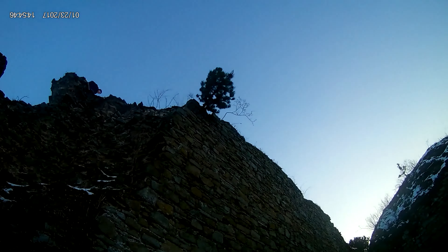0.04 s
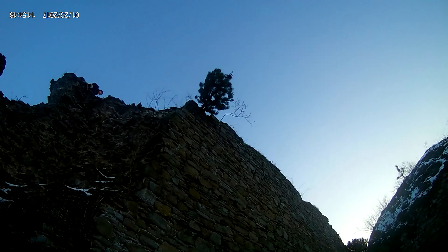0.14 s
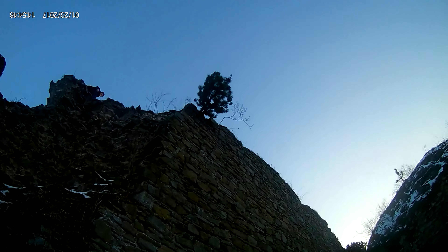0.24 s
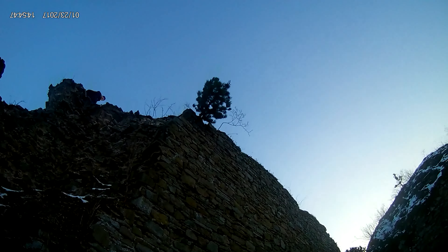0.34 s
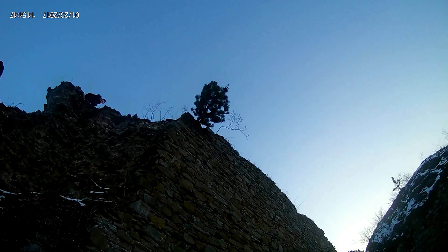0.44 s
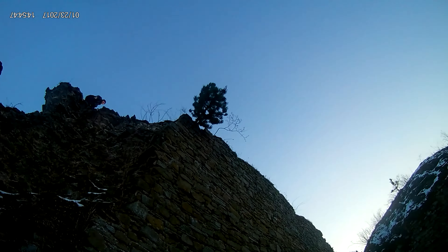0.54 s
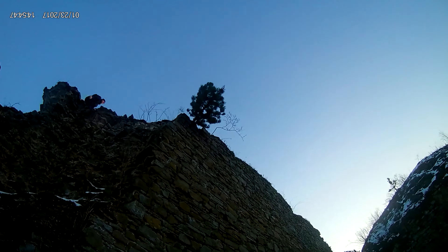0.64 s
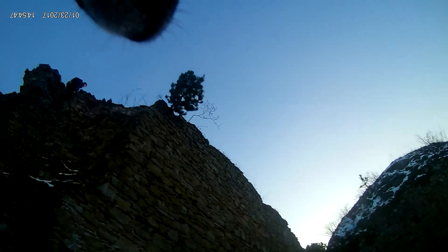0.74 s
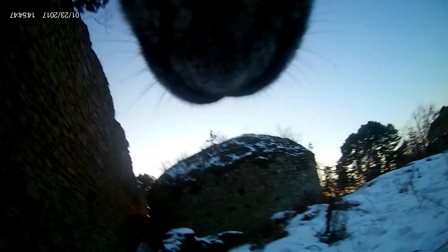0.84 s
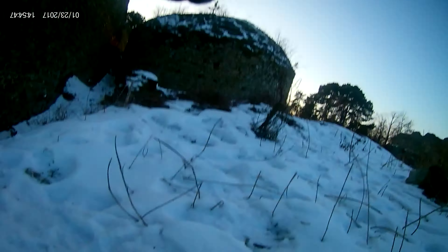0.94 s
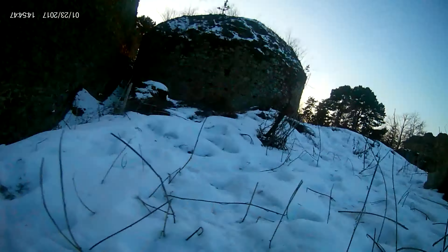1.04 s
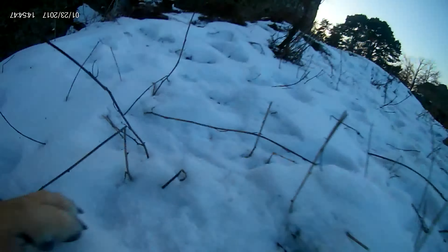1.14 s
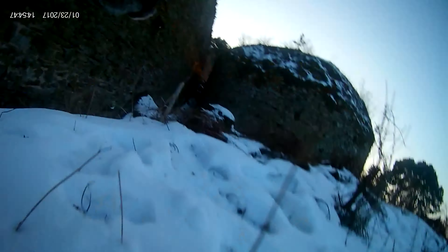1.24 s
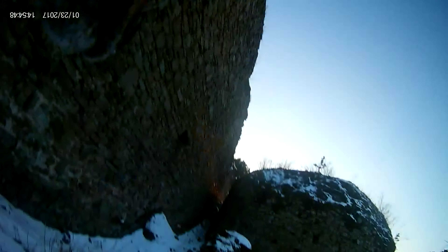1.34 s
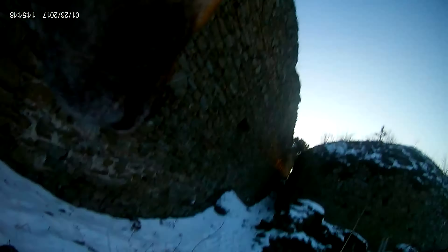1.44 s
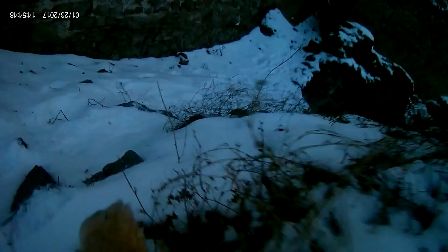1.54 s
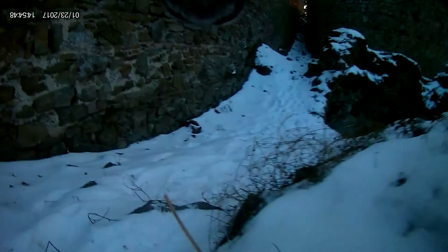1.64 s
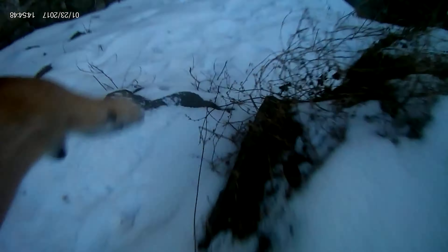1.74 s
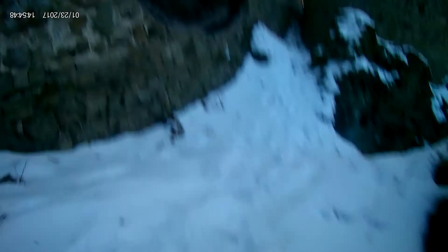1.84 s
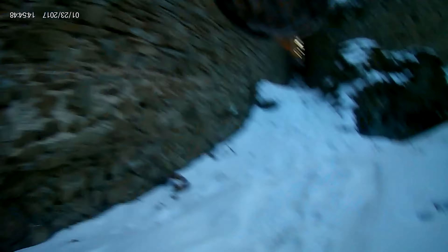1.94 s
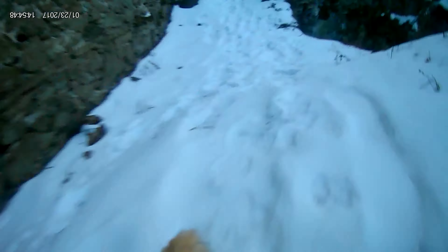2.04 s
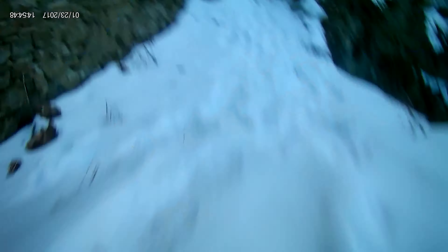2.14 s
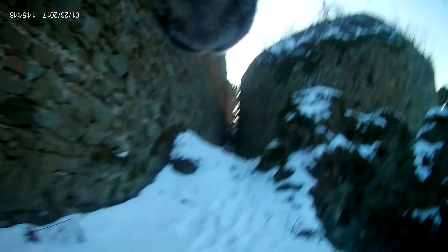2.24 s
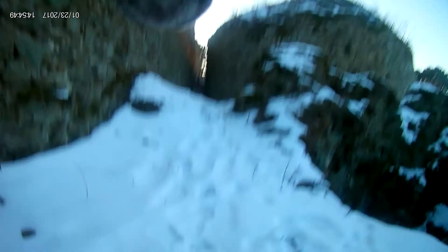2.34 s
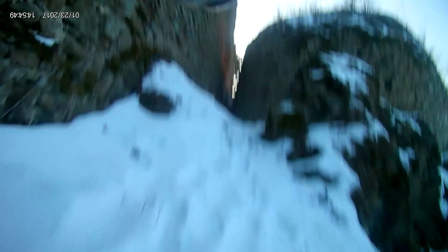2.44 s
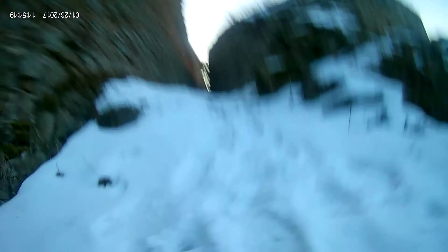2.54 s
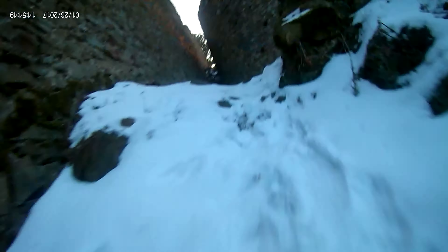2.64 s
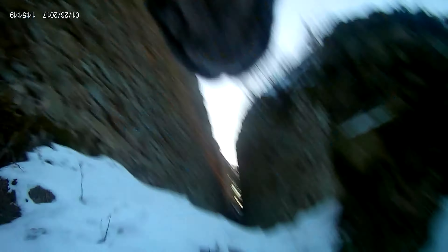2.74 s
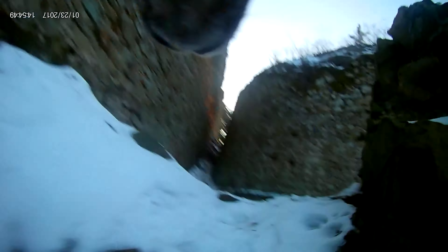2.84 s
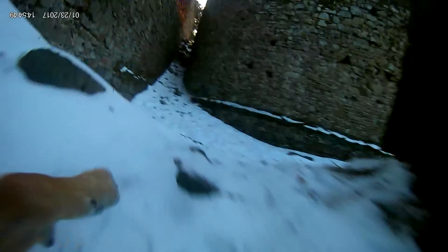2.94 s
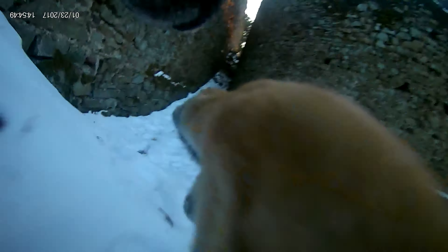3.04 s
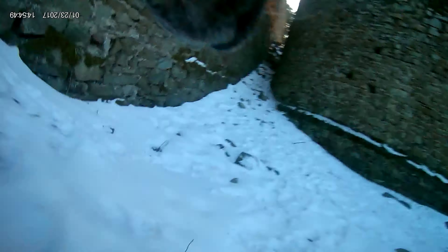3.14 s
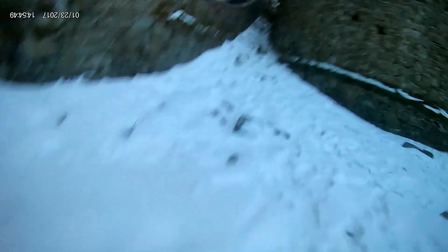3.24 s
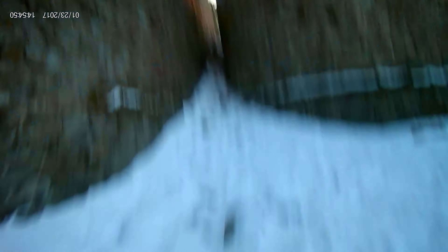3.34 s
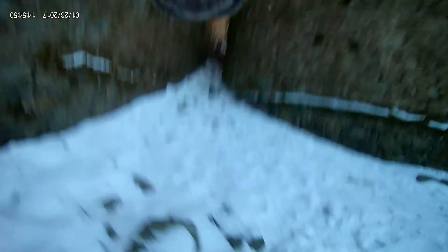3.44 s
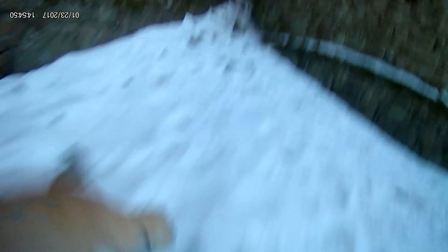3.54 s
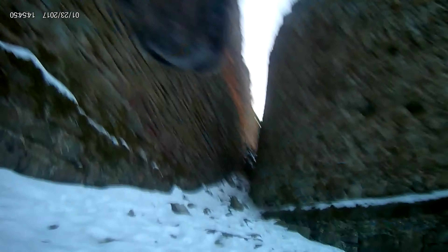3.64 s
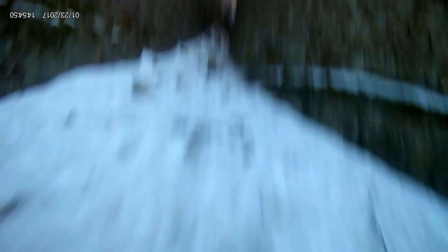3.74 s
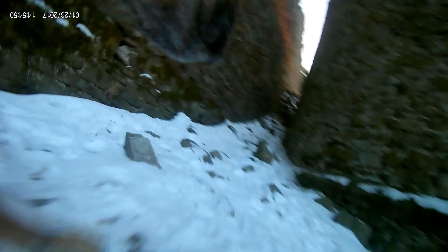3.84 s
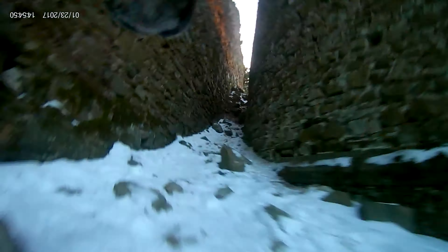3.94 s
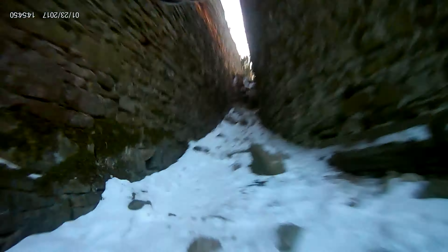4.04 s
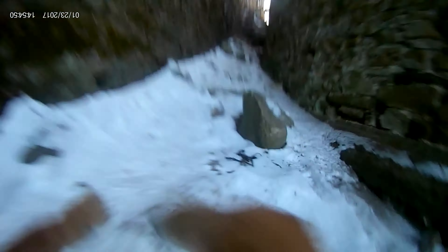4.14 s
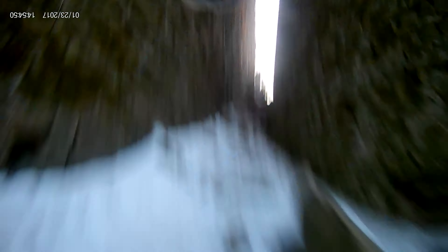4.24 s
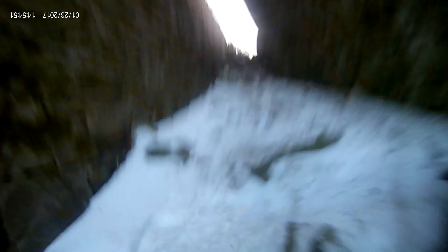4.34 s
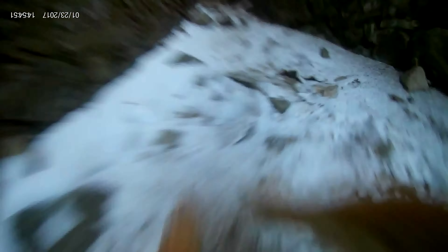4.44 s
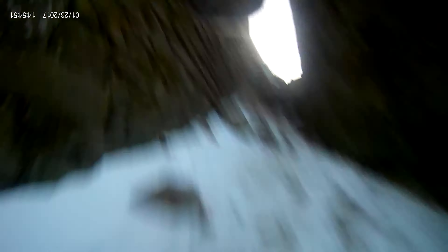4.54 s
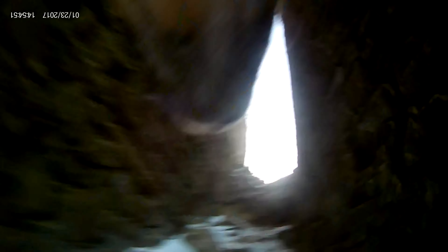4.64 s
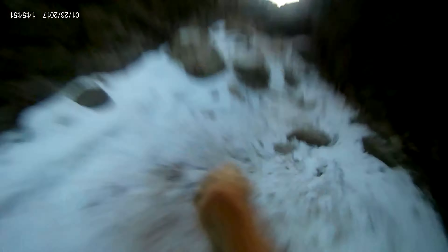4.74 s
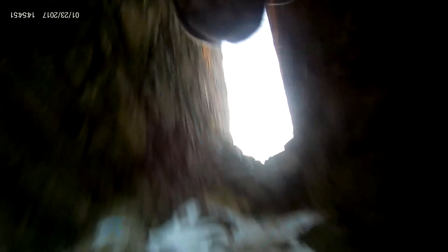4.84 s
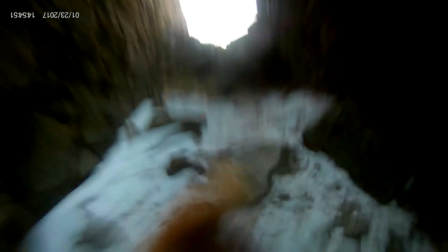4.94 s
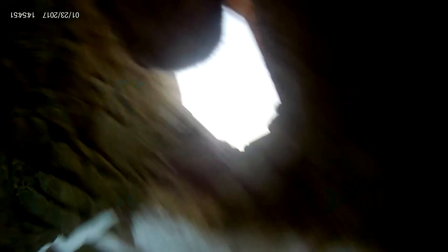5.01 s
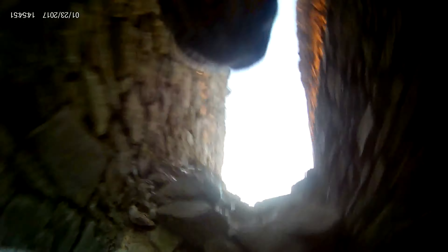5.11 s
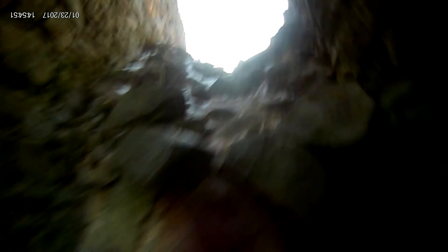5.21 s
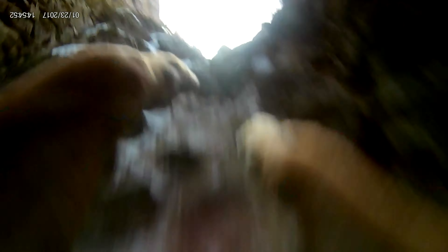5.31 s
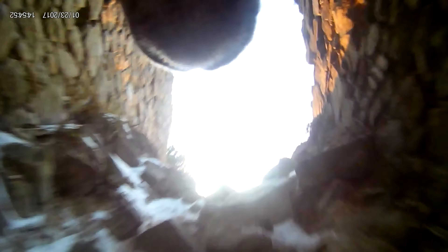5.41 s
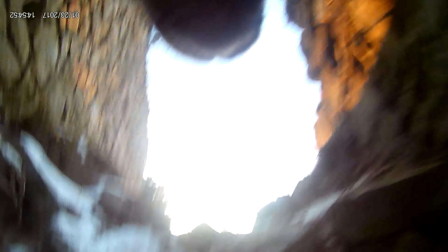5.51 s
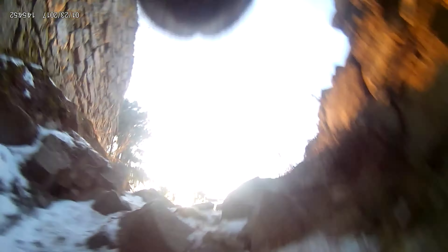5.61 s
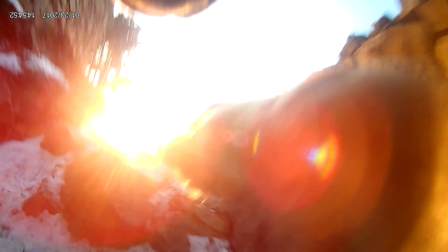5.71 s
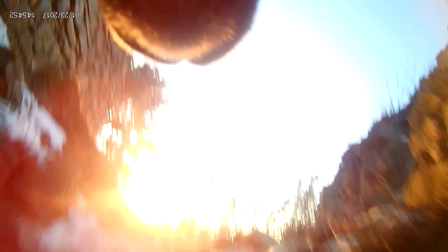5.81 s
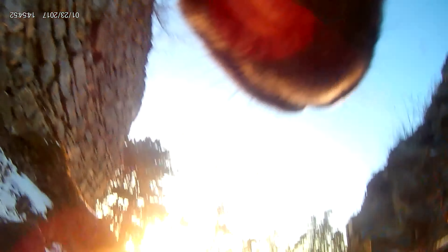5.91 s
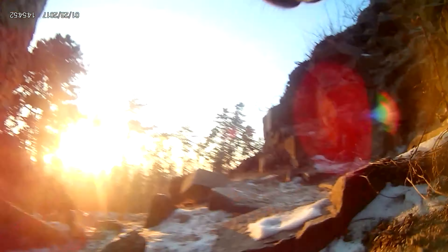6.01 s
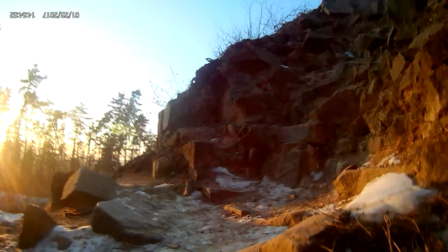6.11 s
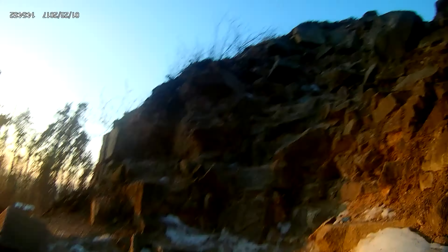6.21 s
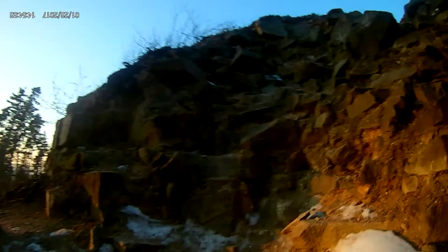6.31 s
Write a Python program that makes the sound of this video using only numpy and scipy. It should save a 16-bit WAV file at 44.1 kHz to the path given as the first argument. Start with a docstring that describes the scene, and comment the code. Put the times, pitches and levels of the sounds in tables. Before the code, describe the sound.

Close, dry plastic knocks, rattles and scratchy fur rubbing from a small camera housing on a running dog's collar, with low thumps and rumble.

```python
"""Blows on a small sealed plastic camera housing, hung from the collar of an animal running over snow and rock.
Each blow's push and chatter of contacts excite the housing's resonances, and rubbing fur and strap
excite the same modes through dense stick-slip ticks.
Jolts squeeze the air trapped at the microphone, random tugs of the swinging collar make a low rumble,
and steady self-noise lies underneath; the input saturates on the hardest blows, flattening their tops."""
import sys
import numpy as np
from scipy import signal
from scipy.fft import rfft, irfft
from scipy.io import wavfile
from scipy.ndimage import uniform_filter1d, map_coordinates

SR = 44100
rng = np.random.default_rng(int(sys.argv[2]) if len(sys.argv) > 2 else 0)


def output_pcm(signal):
    """Save a mono or channel-first signal as 16-bit PCM at the path in sys.argv[1].

    Samples are clipped to [-1, 1] before scaling.
    """
    pcm = np.clip(np.atleast_2d(signal).T, -1, 1) * 32767
    wavfile.write(sys.argv[1], SR, np.round(pcm).astype(np.int16))


N = 280917

# squeezes of the trapped air, levels before the leak: # push_peak_s, pull_level_db (before the push),
# push_level_db, length_scale_ms
SQUEEZES = [(0.9637, -60, -16.5, 2.4), (0.9753, -62, -13, 2.5), (1.1055, -36, -17.5, 1.36),
            (1.2975, -58, -21.5, 2.9), (1.5414, -48, -26, 2.1), (1.7587, -67, -24.5, 1.6),
            (1.7832, -4.5, -13, 11.5), (1.862, -30.5, -55, 20), (1.98, -22, -18, 2),
            (1.992, -51, -6.5, 5.1), (1.9974, -55, -12.5, 2.1), (2.015, -50, -21, 16),
            (2.076, -25, -56, 15), (2.3694, -61, -15.5, 2.3), (2.4935, -39, -22.5, 2.2),
            (2.5702, -55, -8.5, 3.1), (2.594, -56, -21, 20), (2.686, -22, -54, 8),
            (2.7754, -51, -20.5, 3.3), (2.904, -57, -17, 8.2), (3.0097, -3.5, -5.5, 7.3),
            (3.345, -27.5, -56, 8), (3.5188, -22, -56, 6.1), (3.659, -27.5, -25.5, 4.9),
            (3.694, -54, -25, 3.2), (3.7023, -55, -24.5, 3), (3.712, -46, -0.5, 2.13),
            (3.815, -20, -53, 22), (3.9328, -40, -25.5, 4.3), (4.3494, -52, -13.5, 3.9),
            (4.381, -55, -20, 30), (4.549, -54, -24, 2.8), (4.9655, 7.5, 4, 7.2), (5.002, -18.5, -40, 15.5),
            (5.15, -55, -25, 3.3), (5.1607, -53.5, -6.5, 2.9), (5.1638, -56, -11.5, 1.8),
            (5.226, -55, -21, 25), (5.313, -55, -25.5, 17), (5.548, -56, -25, 6.5), (5.6468, -36, -3, 3.5),
            (5.6533, -2.5, -11, 4.6), (5.6608, -24, -7, 7), (5.709, -12, -14, 10), (5.9436, -61, -25, 3.4),
            (6.2874, -53, -22, 1.9)]
# lower resonances of the housing: frequency_hz, width_hz, relative_gain_db
LOW_MODES = [(343, 490, -9), (573, 125, 0), (1082, 477, -6.5), (1479, 248, 1.5), (1488, 184, 2),
             (1644, 172, 3), (2055, 100, -3), (2372, 288, -7.5)]
# upper resonances of the housing: frequency_hz, width_hz, relative_gain_db
HIGH_MODES = [(2490, 470, 0.5), (3300, 170, 4), (3800, 333, 1.5), (4987, 200, -0.5), (5670, 350, -8),
              (7200, 500, 2)]
# resonance of the air in front of the microphone: frequency_hz, width_hz, relative_gain_db
AIR_MODE = [(1665, 1240, 6.5)]
SEAL_HZ = 5950  # the sealed shell passes little above this
DRIFT = 0.03  # scale of the modes' detuning, as a share of frequency


def undb(db):
    """Level law: amplitude ratio = 10 ** (dB / 20)."""
    return 10 ** (np.asarray(db) / 20)


def level(x, db):
    """Root-mean-square normalization to a level in dB re 1."""
    return x * undb(db) / np.sqrt(np.mean(x ** 2))


def curve(table):
    """Linear interpolation in time of each column after the first."""
    s, *columns = np.transpose(table)
    return [np.interp(np.arange(N) / SR, s, column) for column in columns]


def walk(rate_hz):
    """Slewed sample-and-hold noise: random values held for one period, with a spread near 1."""
    hold = int(SR / rate_hz)
    steps = np.repeat(rng.standard_normal(N // hold + 1), hold)
    return 1.68 * uniform_filter1d(steps, hold // 2 + 1)[:N]


def add(out, s, x):
    """Linear superposition of an event that starts at s seconds."""
    i = int(s * SR)
    out[i:i + len(x)] += x[:len(out) - i]


def ring(force, modes, shares):
    """Modal superposition: each resonance takes its share of the force, then the shell low-passes the sum."""
    total = 0
    for share, (hz, width_hz, db) in zip(shares, modes):
        b, a = signal.iirpeak(hz, hz / width_hz, SR)
        total = total + share * undb(db) * signal.lfilter(b, a, force)
    shell = signal.ellip(5, 1, 30, SEAL_HZ, fs=SR, output="sos")
    return signal.sosfilt(shell, total)


def still():
    """Stationary self-noise of the microphone: white noise shaped to a fixed spectrum of hiss and faint rumble."""
    # shape of the self-noise: frequency_hz, relative_level_db
    noise_shape = [(12, -37.5), (20, 10.5), (60, -5), (377, -17), (434, -19.5), (1570, -24), (6010, -35.5),
                   (14700, -36.5), (16000, -34)]
    hz, db = np.transpose(noise_shape)
    bins_hz = np.fft.rfftfreq(N, 1 / SR)
    gain = undb(np.interp(np.log(bins_hz + 1), np.log(hz), db))
    return level(irfft(rfft(rng.standard_normal(N)) * gain, N), -66)


def swing():
    """Filtered shot noise: random tugs of the collar, stronger just after a jolt, make a lumpy low rumble."""
    # strength of the swing: time_s, relative_level_db
    swing_strength = [(0.7, -61), (0.82, -44), (1.48, -47.5), (1.72, -36), (2.11, -41.5), (2.4, -42.5),
                      (2.58, -34.5), (3.09, -61), (3.36, -30.5), (3.49, -41.5), (3.7, -32.5), (4.25, -40.5),
                      (4.81, -37), (5.1, -42), (5.53, -41), (5.82, -47.5), (6.21, -54.5), (6.37, -50)]
    # each jolt shakes the collar: level against the jolt's stronger half, lag, spread
    shake_db, delay_s, spread_s = -35, 0.034, 0.044
    t = np.arange(N) / SR
    db, = curve(swing_strength)
    size = undb(db)
    for s, pull_db, push_db, _ in SQUEEZES:
        shake = np.exp(-((t - s - delay_s) / spread_s) ** 2)
        size = size + undb(max(pull_db, push_db) + shake_db) * shake
    tugs = (rng.random(N) < 90 / SR) * rng.standard_normal(N)  # 90 per second on average
    tugs = tugs * size * undb(2.6 * walk(14)) * (t > swing_strength[0][0])
    low = signal.sosfilt(signal.butter(2, 30, fs=SR, output="sos"), tugs)
    bumps = signal.sosfilt(signal.butter(2, [70, 300], "bandpass", fs=SR, output="sos"), tugs)
    return undb(55) * low + undb(24) * bumps


def pressure():
    """Power addition of a steady rub and scuffs: drive for the lower modes, the upper modes and the treble spray."""
    # steady rubbing of fur and strap: time_s, relative_level_db
    steady_rub = [(0.67, -74), (0.74, -66), (0.9, -57), (1.15, -50), (1.465, -54.5), (1.6, -52.5),
                  (1.85, -45), (2.12, -52), (2.25, -46.5), (2.65, -46.5), (2.97, -49.5), (3.2, -62.5),
                  (3.45, -47), (3.8, -52.5), (4.2, -54), (4.69, -53.5), (5.05, -42.5), (5.44, -57),
                  (5.75, -48), (6.03, -61.5)]
    # scuffs, when a stride drags the housing across the fur:
    # start_s, hold_ms, relative_level_db, brightness_db
    scuffs = [(0.75, 69, -51.5, -11), (0.958, 22, -38, -9), (1.057, 40, -50.5, -11),
              (1.109, 23, -42.5, -10), (1.195, 34, -43, -8), (1.351, 44, -47, -9), (1.529, 15.4, -44, -6.5),
              (1.621, 18, -44, -10), (1.777, 16, -44, 0), (1.89, 55, -38, -12), (1.974, 22, -27.5, -20),
              (2.041, 17, -40, -14.5), (2.148, 39, -36.5, -10.5), (2.376, 22, -43, -1),
              (2.472, 27, -37, -8), (2.545, 55, -40, -11), (2.73, 49, -36.5, -11), (2.832, 59, -39.5, -16),
              (2.911, 21, -42, -17), (3.005, 17, -48.5, 3), (3.253, 86, -40.5, -13.5),
              (3.51, 14, -44.5, -1.5), (3.634, 32, -33, -13), (3.711, 12, -32, -9.5),
              (3.74, 77, -40.5, -14), (3.897, 42, -38, -21), (3.997, 55, -37.5, -10.5),
              (4.239, 62, -35.5, -12.5), (4.352, 20, -26.5, -27), (4.409, 25, -39, -22),
              (4.438, 12, -34, -6), (4.478, 20, -32, -12), (4.514, 115, -39.5, -15), (4.731, 43, -48, -3),
              (4.8, 36, -36, -14), (4.93, 28, -36, -15), (4.972, 26, -34, -1), (5.142, 23, -31.5, -16),
              (5.21, 20, -39.5, -11.5), (5.24, 130, -51, -2), (5.485, 12, -38.5, -9.5),
              (5.519, 45, -42.5, -19), (5.652, 9, -31, -3), (5.712, 30, -37, -13), (5.945, 45, -47, -12),
              (6.15, 48, -53.5, -14), (6.228, 30, -42, -17), (6.288, 66, -54, -7)]
    attack_db_s, release_db_s = 1502, 801  # slopes in the lower modes; the other two rows are steeper
    rub_bright_db = -9.5  # brightness of the steady rub
    step = 16  # samples per value
    t = np.arange(0, N, step) / SR
    db = curve(steady_rub)[0][::step]
    reach = np.array([[0], [1], [1.9]])  # how far brightness counts in each of the three rows
    power = undb(db + reach * rub_bright_db) ** 2
    for s, hold_ms, db, bright_db in scuffs:
        before_s = np.maximum(s - t, 0)
        after_s = np.maximum(t - s - hold_ms / 1000, 0)
        fall_db = attack_db_s * before_s + release_db_s * after_s
        power = power + undb(db + reach * bright_db - (1 + 0.3 * reach) * fall_db) ** 2
    drive = np.sqrt(power) * (t > steady_rub[0][0])
    return np.repeat(drive, step, axis=1)[:, :N]


def rubbing():
    """Stick-slip friction: dense uneven ticks excite modes that trade strength as the rubbed spot wanders."""
    heavy_tail = undb(2.41 * np.minimum(rng.exponential(size=(2, N)), 3.2))
    slips = (rng.random((2, N)) < 3000 / SR) * rng.standard_normal((2, N)) * heavy_tail
    slips += (rng.random(N) < 90 / SR) * rng.uniform(-1, 1, N) * undb(12)  # now and then a hair snaps free
    patches = undb(0.5 * walk(45) + 1.5 * walk(160))
    low_slips, high_slips, spray_slips = slips[[0, 1, 1]] * pressure() * patches

    shares = [(-1) ** k * undb(1.49 * walk(22)) for k in range(len(LOW_MODES))]
    shell = ring(low_slips, LOW_MODES, shares)
    body = undb(21.5) * shell + undb(8.5) * ring(shell, AIR_MODE, [1])
    # the grip of fur and strap detunes the housing: a wandering lag bends the lower modes
    lag = DRIFT * signal.lfilter([1], [1, 30 / SR - 1], walk(25))
    body = map_coordinates(body, [np.arange(N) + lag], mode="mirror")

    high_shares = [share * undb(0.8 * walk(40)) for share in shares]
    edge = ring(high_slips * undb(1.2 * walk(60)), HIGH_MODES, high_shares)
    # treble that gets past the seal, mostly from bright scuffs
    spray_band = signal.butter(2, [8300, 11000], "bandpass", fs=SR, output="sos")
    spray = signal.sosfilt(spray_band, spray_slips)
    return body + undb(10.3) * edge + undb(-15) * spray


def jolts(rise=0.26, overlap=0.13, brief=0.6):
    """Compression of trapped air: a brief pull lets go fast, then a push rises fast and falls slower."""
    out = np.zeros(N)
    for s, pull_db, push_db, ms in SQUEEZES:
        rise_s = rise * ms / 1000
        for db, way, span_s in ((push_db, 1, rise_s), (pull_db, -1, brief * rise_s)):
            u = np.arange(int(8 * span_s * SR)) / (span_s * SR)
            hump = (u * np.exp(1 - u)) ** 2  # peaks at u = 1
            start_s = s - rise_s
            if way < 0:
                start_s = s - rise_s * (1 - overlap) - len(u) / SR
            add(out, start_s, way * undb(db) * hump[::way])  # the pull runs reversed
    return out


def leak(x):
    """Second-order high-pass: trapped air leaks past the seal, so every squeeze swings back once, slowly."""
    corner_hz, width_hz = 24.7, 26
    w = 2 * np.pi * corner_hz
    b, a = signal.bilinear([1, 0, 0], [1, 2 * np.pi * width_hz, w * w], SR)
    return signal.lfilter(b, a, x)


def knocks(chatter=0.19, fade=0.91, spot_db=5.5, direct_db=3, follow=0.2):
    """Impact excitation: a short push and a chatter of contacts, shared among modes by where the blow lands."""
    # blows on the housing: start_s, body_peak_db, contact_scale_ms, upper_mode_brightness_db
    blows = [(0.359, -54, 2.9, -10), (0.745, -44, 2.2, -8), (0.926, -21.5, 7.6, -32),
             (0.963, -10, 3.7, -11), (0.9741, -20, 1.7, -22), (1.1057, -13, 4.1, -11),
             (1.172, -33.5, 1.8, -35), (1.2944, -20, 3.1, -20.5), (1.384, -28.5, 2.7, -22),
             (1.497, -39.5, 1.4, -2), (1.644, -31.5, 2, -4.5), (1.6826, -23, 2.4, -36),
             (1.7572, -20.5, 3.1, -12), (1.765, -32, 2.5, 0), (1.8986, -26, 3.9, -42),
             (1.9746, -8.5, 0.97, -25), (1.9916, -4.5, 12.3, -20), (1.9975, -14, 3, -8),
             (2.066, -30, 1.5, -33), (2.146, -24, 6.9, -34), (2.1656, -23, 3.2, -23),
             (2.317, -26.5, 4.2, -31), (2.3693, -14.5, 3.4, -27), (2.4549, -24, 5.8, -41),
             (2.5455, -25, 3, -15), (2.5689, -13, 3.6, -17), (2.587, -23, 4.1, -30), (2.6155, -36, 2, 0),
             (2.667, -20.5, 1.9, -17), (2.7716, -24.5, 1.8, -41), (2.8581, -12.5, 0.94, -27),
             (2.9024, -11.5, 4.2, -8), (2.9992, -34, 3.1, 12), (3.0084, -16.5, 3.7, -12),
             (3.013, -16, 4.7, -36), (3.072, -42.5, 5.9, 3.5), (3.2655, -27, 5.9, -35),
             (3.3419, -30, 2, -30), (3.6568, -16, 1.4, -38), (3.7115, -21.5, 2.8, 5.5),
             (3.7184, -22, 2.8, -25), (3.808, -29, 1, -29), (3.902, -27, 7.8, -12), (3.9918, -20, 3.7, -27),
             (4.0206, -24, 2.7, -25), (4.2361, -17.5, 3.8, -32), (4.331, -21.5, 12, -27),
             (4.351, 1.5, 5, -47), (4.3595, -3, 6, -45), (4.412, -25, 1.7, -37), (4.466, -8.5, 1.2, -30),
             (4.479, -15.5, 1.3, -35), (4.518, -18, 23, -21), (4.8, -26, 2.1, -24), (4.9046, 3, 4, -57),
             (4.9135, -8, 1, -47), (4.9209, -19, 1.8, -45), (4.9462, 3.5, 5.3, -36), (4.954, -17, 2.5, -30),
             (5.1508, -26, 2.9, -19), (5.16, -18, 7.8, -33), (5.2137, -23, 4.1, -37), (5.2985, 5, 7, -52),
             (5.397, -29.5, 2, -25), (5.4967, -27, 2.3, -20), (5.547, -28, 5.5, -22),
             (5.646, -12, 1.45, -5), (5.6497, 1.5, 8.4, -35), (5.6545, -16, 2, -15),
             (5.6646, 2.5, 4.1, -38), (5.6726, -2.5, 2.7, -52), (5.6755, -5.5, 2, -45),
             (5.8931, -25.5, 4.8, -39), (5.9429, -23, 1.5, -24.5), (5.948, -25, 2.5, -12),
             (6.1918, -8, 0.27, -77.5), (6.2879, -19, 8.9, -39)]
    out, t = np.zeros(N), np.arange(1500) / SR
    t_ms = t * 1000
    for (s, db, ms, bright_db), grit in zip(blows, rng.standard_normal((len(blows), 3, len(t)))):
        low_force, high_force = chatter * grit[:2] * np.exp(-(t_ms / (fade * ms)) ** 2)
        push_ms = 0.088 - 0.0009 * min(bright_db, 0)  # duller blows push longer
        low_force = low_force + np.exp(-(t_ms / push_ms - 2.6) ** 2)
        spot = undb(spot_db * np.clip(grit[2], -1, 1))  # one share per mode
        shell = ring(low_force, LOW_MODES[2:], spot)  # a blow is too brief to move the two lowest modes
        edge = ring(high_force, HIGH_MODES, spot[::-1])
        # some of the shell's ring reaches the capsule straight, treble first, less so from the dullest blows
        direct = undb(direct_db + follow * min(bright_db, -20)) * np.gradient(shell)
        body = ring(shell, AIR_MODE, [1]) + direct
        blow = body / np.abs(body).max() + undb(bright_db) * edge / np.abs(edge).max()
        stretch = 1 + DRIFT * np.clip(grit[2, -1], -2, 2)  # detunes the whole blow
        add(out, s, undb(db) * np.interp(t * stretch, t, blow))
    return out


def scene():
    """Superposition of the rubbing, the leaking air pressure and the blows, as one channel."""
    air = leak(jolts() + swing())
    return (rubbing() + air + knocks())[None]


def record(dry):
    """Saturation, then linear filtering: flat tops droop, a notch, added self-noise and a steep treble cut."""
    ceiling, coupling_hz, top_hz = .66, 12, 15900
    notch_hz, notch_width_hz = 8060, 770  # the microphone is deaf in a narrow band
    limited = dry / (1 + np.abs(dry / ceiling) ** 7) ** (1 / 7)
    coupled = signal.lfilter(*signal.butter(1, coupling_hz, "highpass", fs=SR), limited)
    notched = signal.lfilter(*signal.iirnotch(notch_hz, notch_hz / notch_width_hz, SR), coupled)
    top_cut = signal.ellip(12, .2, 70, top_hz, fs=SR, output="sos")
    return signal.sosfilt(top_cut, notched + still())


dry = scene()
out = record(dry)
output_pcm(out)
```